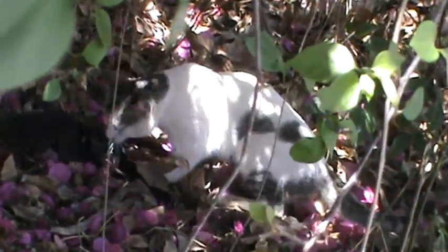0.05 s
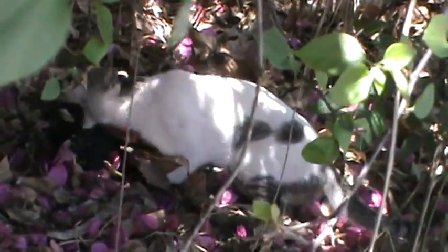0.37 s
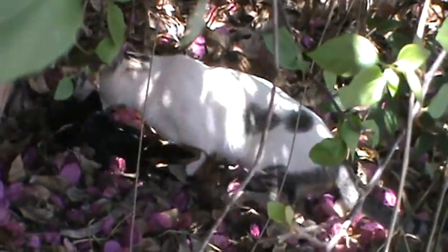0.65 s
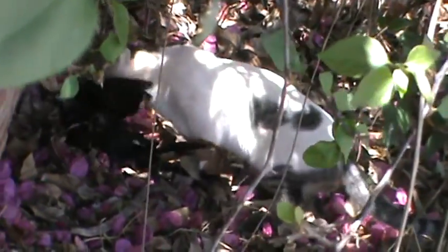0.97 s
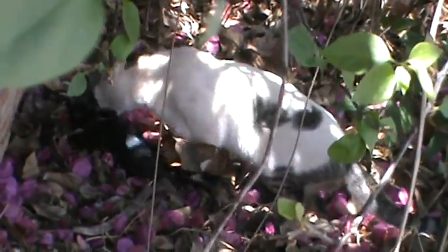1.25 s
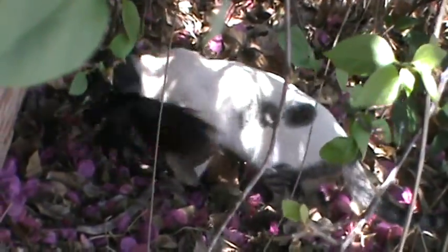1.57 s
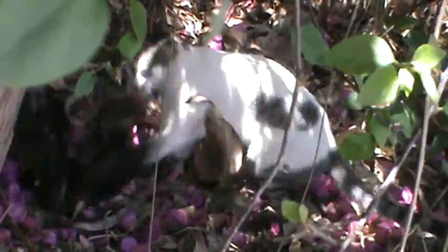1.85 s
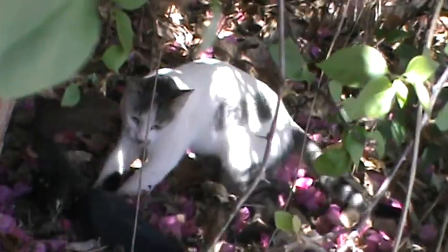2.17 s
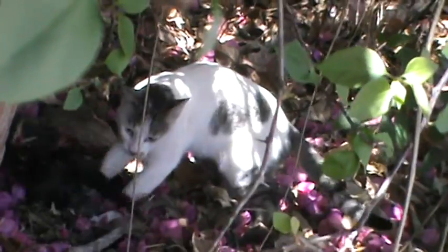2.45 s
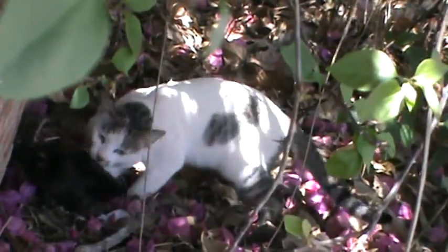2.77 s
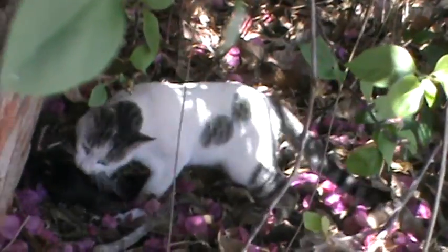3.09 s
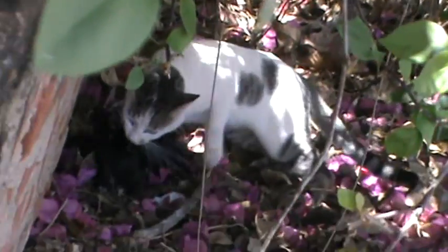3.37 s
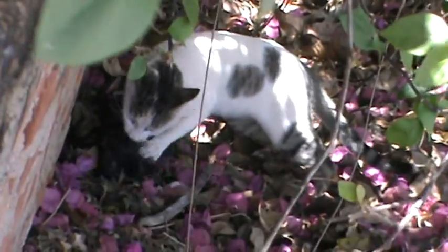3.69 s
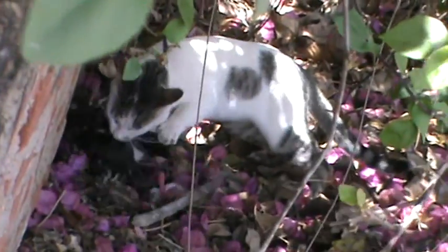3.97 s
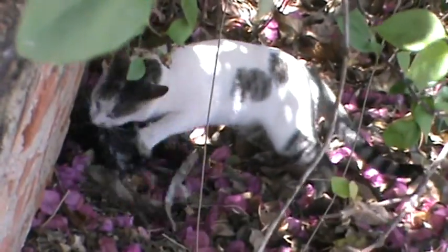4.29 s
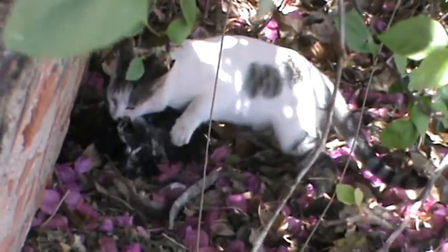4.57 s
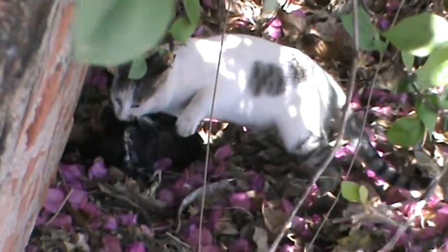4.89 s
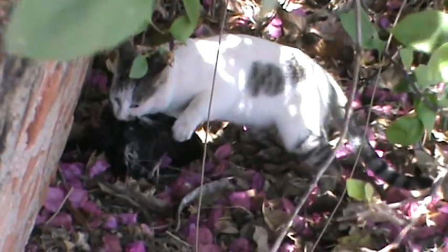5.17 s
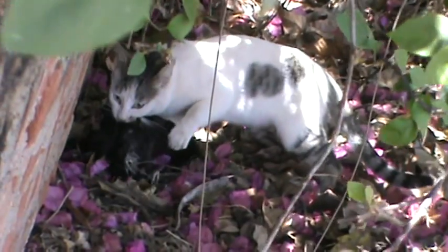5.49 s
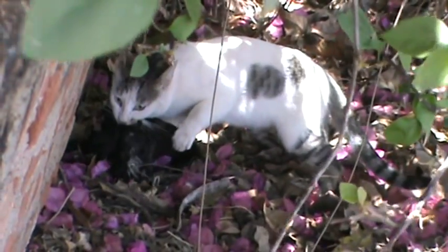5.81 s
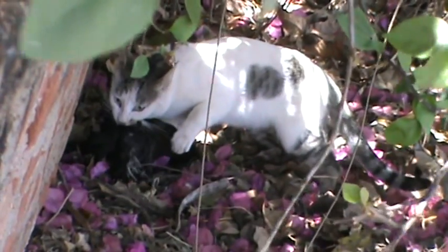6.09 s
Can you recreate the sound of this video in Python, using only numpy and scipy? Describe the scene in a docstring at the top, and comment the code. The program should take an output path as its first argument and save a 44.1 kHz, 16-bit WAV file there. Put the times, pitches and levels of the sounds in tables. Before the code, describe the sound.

Repeated raspy, nasal bird screams over a scuffle in dry leaves, with high alarm chirps and a few low microphone bumps.

```python
"""A bird screams again and again, pinned by a cat in dry leaves under a garden shrub.
Its voice breaks between a clear nasal tone (harmonics through throat and beak) and a rasp
(membranes slapping irregularly). Other birds whistle alarms, later pip, among garden echoes.
Leaves crackle in the scuffle, with one dull thud, over faint air noise. A hand-held camera
close by whines faintly, knocks and rumbles in the hand."""
import sys
import numpy as np
from scipy import signal
from scipy.fft import rfft, irfft, next_fast_len
from scipy.io import wavfile

SR = 44100
rng = np.random.default_rng(int(sys.argv[2]) if len(sys.argv) > 2 else 0)


def wav_out(sig):
    """Save sig, one row per channel (or a flat mono array), as 16-bit PCM at SR to the path in sys.argv[1]."""
    wavfile.write(sys.argv[1], SR, np.round(np.clip(np.atleast_2d(sig).T, -1, 1) * 32767).astype(np.int16))


N = 270774
TIME = np.arange(N) / SR

# outdoor air noise (frequency [Hz], level [dB])
AIR_SPECTRUM = [(12, -28), (20, 1), (54, 2), (200, -5.5), (497, -5.5), (2280, -11.5), (8620, -23.5),
                (15000, -25.5)]
# cat shifting in the leaves (time [s], level [dB], settling time [s])
PAW_STEPS = [(.03, -48, 0.072), (.14, -44.5, 0.067), (.9, -43, 0.16), (1.878, -35, 0.12), (1.945, -37, .14),
             (3.81, -47, 0.11), (4.15, -43, 0.18), (4.45, -49.5, 0.088), (4.745, -50, 0.073)]
# dry leaf crackle (frequency [Hz], level [dB])
LEAF_SPECTRUM = [(200, -9), (1500, -1), (8000, 0), (12500, 3), (15500, -2.5)]
# single leaves and twigs cracking (time [s], level [dB])
TWIG_CRACKS = [(1.857, -30), (2.959, -45.5), (3.811, -50), (4.735, -44), (4.854, -58), (5.545, -58)]
# low rumble (frequency [Hz], level [dB])
RUMBLE_SPECTRUM = [(12, -41), (20, -16), (55, -6.5), (108, -6), (260, -17), (604, -32.5), (900, -38),
                   (1170, -59), (1980, -120)]
# low rumbles: the hand shifting on the camera, and a dull thud from the scuffle at 1.95 s
# (time [s], level [dB], settling time [s])
LOW_RUMBLES = [(.08, -48, 0.6), (1.95, -50, 0.075), (4.87, -32.5, 0.32), (5.04, -33, 0.047),
               (5.5, -45.5, 0.16), (5.88, -37, 0.15), (6.09, -39, 0.16)]
# hand bumps (time [s], level [dB])
HAND_BUMPS = [(.085, -35), (1.305, -40.5), (4.938, -19), (5.002, -17), (5.07, -15.5), (5.606, -32),
              (5.656, -30.5), (5.855, -22.5), (6.076, -24.5)]
# alarm whistles (start [s], length [s], pitch [Hz], glide [Hz], level [dB])
ALARM_WHISTLES = [(.076, 0.084, 6130, 190, -37.5), (.137, 0.034, 3110, -2, -36),
                  (.142, 0.03, 4357, -420, -34), (.191, 0.036, 2734, -310, -37),
                  (.287, 0.1, 2513, -150, -42.5), (.288, 0.041, 3047, -80, -36.5),
                  (.316, 0.044, 6020, -310, -35.5), (.341, 0.0313, 4425, -700, -37),
                  (.428, 0.028, 2553, 0, -42.5), (0.454, 0.053, 3254, 1200, -36.5),
                  (.444, 0.064, 6310, 184, -37.5), (0.449, 0.061, 4710, -250, -33.5),
                  (.5, 0.0844, 4228, 356, -31.5), (.576, 0.054, 5860, -300, -35),
                  (.643, 0.038, 5970, 5, -27), (.761, 0.049, 6080, 5, -35.5), (.816, 0.065, 6195, 177, -31),
                  (.823, 0.031, 4284, -400, -27.5), (.844, 0.079, 4776, -400, -34),
                  (.892, 0.082, 6010, -500, -38.5), (.924, 0.076, 4596, -340, -29.5),
                  (.975, 0.054, 3910, -690, -36.5), (1.05, .152, 2505, 253, -34.5),
                  (1.117, 0.029, 3180, -410, -41), (1.232, 0.082, 3790, 1303, -37),
                  (1.24, 0.055, 5795, -200, -31.5), (1.28, 0.065, 4306, -330, -29.5),
                  (1.369, 0.024, 3410, -200, -41.5), (1.39, 0.06, 5550, -460, -37.5)]
# falling pips of a farther bird (start [s], level [dB])
FAR_PIPS = [(4.786, -45.5), (4.845, -48), (4.928, -43.5), (4.972, -44), (5.009, -51), (5.078, -47.5),
            (5.128, -49), (5.189, -54)]
# knocks on the camera body (time [s], peak [dB], tilt [dB/octave], rattle [dB])
BODY_KNOCKS = [(0.3097, -22, -1, -24), (3.415, -19.5, -0.5, -23), (5.085, -33.5, -2, -18),
               (5.323, -35.5, -6, -10)]
# camera casing modes (frequency [Hz], level [dB])
CASING_MODES = [(620, -2.5), (861, 1), (1168, 0.5), (1378, -0.5), (1647, -8), (2331, -2), (3200, -10.5)]
# screams, the last two feeble (start [s], clear from [s], crest [s], clear until [s], end [s],
# crest pitch [Hz], glide [Hz/s], tone [dB], overtone bite [dB], beamed treble [dB], rasp [dB])
BIRD_SCREAMS = [(.555, .68, .723, .826, 0.83, 1304, 4245, -23, 6, 2, -26),
                (1.499, 1.586, 1.641, 1.723, 1.748, 1232, 3690, -25.5, -1, 12.5, -25.5),
                (1.977, 1.977, 2.06, 2.093, 2.16, 1055, 2385, -32.5, -10.5, 18.5, -31.5),
                (2.364, 2.364, 2.438, 2.503, 2.535, 1169, 2410, -28.5, 1, 1.5, -26.5),
                (2.733, 2.733, 2.828, 2.91, 2.93, 1194, 3084, -28, 3.5, -1, -36),
                (3.118, 3.2, 3.212, 3.35, 3.37, 1199, 2480, -28, 3, -1, -29.5),
                (3.519, 3.578, 3.623, 3.716, 3.745, 1205, 2873, -27, 1.5, 4, -28),
                (3.903, 4.02, 3.995, 4.097, 4.1, 1233, 3300, -27.5, -1.5, 0.5, -27.5),
                (4.312, 4.352, 4.37, 4.402, 4.39, 962, 1400, -41.5, 3.5, -8, -35.5),
                (4.728, 4.728, 4.74, 4.81, 5.3, 830, 804, -54.5, -6, -3, -65)]
# resonances of the rasp (frequency [Hz], gain [dB])
RASP_RESPONSE = [(600, -16.5), (1270, -3.5), (1650, -3.5), (2200, 1.5), (2900, 3), (3600, -1.5),
                 (5000, -19), (6300, -11), (7800, -24.5), (9500, -17.5), (15000, -30)]
# throat and open beak (frequency [Hz], gain [dB])
THROAT_RESPONSE = [(500, -27), (1100, -5.5), (2100, 3), (3500, 5.5), (4170, -7), (4700, -5), (5550, -12.5),
                   (6500, -10.5), (7800, -24), (9500, -19), (15000, -24.5)]
# the part of the voice that shakes (frequency [Hz], gain [dB])
GROWL_RESPONSE = [(1400, -22), (2300, -2), (3100, 0.5), (4300, -5.5)]


def gain(db):
    """Decibels to amplitude."""
    return 10 ** (np.asarray(db) / 20)


def unit_rms(x):
    """Scales to rms 1."""
    return x / np.sqrt(np.mean(x ** 2) + 1e-20)


def db_at(spectrum, hz):
    """Interpolates a spectrum over log frequency."""
    points_hz, db = np.transpose(spectrum)
    return np.interp(np.log(hz + 1), np.log(points_hz + 1), db)


def add(mix, start_s, sound):
    """Mixes a sound in at start_s."""
    part = mix[max(round(start_s * SR), 0):][:len(sound)]
    part += sound[:len(part)]


def coloured(x, spectrum):
    """Zero-phase filter; output rms 1."""
    size = next_fast_len(len(x))
    response = gain(db_at(spectrum, np.fft.rfftfreq(size, 1 / SR)))
    return unit_rms(irfft(rfft(x, size) * response, size)[:len(x)])


def ringing(x, spectrum, size=2048):
    """Minimum-phase filter: each pulse rings on in the resonances; output rms 1."""
    log_gain = np.log(gain(db_at(spectrum, abs(np.fft.fftfreq(size, 1 / SR)))))
    impulse = np.fft.ifft(np.exp(np.conj(signal.hilbert(log_gain)))).real
    return unit_rms(signal.fftconvolve(x, impulse[:size // 2])[:len(x)])


def wander(t, hz):
    """Smooth noise, rms about 1, bandwidth about hz."""
    size = next_fast_len(max(len(t), SR // 2))
    lowpass = np.exp(-(np.fft.rfftfreq(size, 1 / SR) / hz) ** 2)
    return unit_rms(irfft(rfft(rng.standard_normal(size)) * lowpass, size))[:len(t)]


def swells(moves, rise_s):
    """Envelope of movements that build and settle, summed in power."""
    envelopes = (gain(db) * np.exp(-np.maximum((peak_s - TIME) / rise_s, (TIME - peak_s) / fall_s))
                 for peak_s, db, fall_s in moves)
    return np.sqrt(sum(envelope ** 2 for envelope in envelopes))


def air(db=-51.5):
    """Steady outdoor noise."""
    return gain(db) * coloured(rng.standard_normal(N), AIR_SPECTRUM)


def camera_whine(hz=15625, db=-64.5):
    """Thin tone of the electronics."""
    return gain(db) * unit_rms(np.sin(2 * np.pi * hz * TIME))


def scuffle(thrash_db=-20.5, settle_s=0.12, stir_db=-57, still_db=-63.5, still_from_s=4.9):
    """Force on the leaves: thrashing at each scream, paws, a stir that drops as the cat holds still."""
    thrashes = [(crest_s, db + thrash_db, settle_s)
                for _, _, crest_s, _, _, _, _, db, *_ in BIRD_SCREAMS]
    thrash = swells(thrashes, rise_s=0.15)
    paws = swells(PAW_STEPS, rise_s=0.06)
    stir = gain(np.where(TIME < still_from_s, stir_db, still_db))
    return np.sqrt(thrash ** 2 + paws ** 2 + stir ** 2)


def leaves(grains_per_s=2200, spread_db=2, clump_db=2, crush_db=-4, crack_s=0.01):
    """Clumps of tiny fractures over a soft crush, with a few louder cracks."""
    grains = (rng.random(N) < grains_per_s / SR) * rng.choice([-1, 1], N)
    grains = grains * gain(spread_db * np.minimum(rng.exponential(1, N), 4))
    crush = gain(crush_db) * rng.standard_normal(N)
    force = scuffle() * gain(clump_db * wander(TIME, 20.5))
    for start_s, db in TWIG_CRACKS:
        add(force, start_s, gain(db) * np.exp(-TIME[:SR // 10] / crack_s))
    return coloured(unit_rms(grains) + crush, LEAF_SPECTRUM) * force


def rumbles(lump_db=4, bump_s=0.0029, bump_hz=110):
    """Lumpy rubbing of the hand, one scuffle thud, and hand bumps that die within a cycle or two."""
    lumps = rng.standard_normal(N) * gain(lump_db * wander(TIME, 57))
    out = coloured(lumps, RUMBLE_SPECTRUM) * swells(LOW_RUMBLES, rise_s=0.077)
    t = TIME[:SR // 10]
    envelope = t / bump_s * np.exp(1 - t / bump_s)
    for start_s, db in HAND_BUMPS:
        hz = bump_hz * rng.uniform(0.8, 1.25)
        add(out, start_s, gain(db) * envelope * np.sin(2 * np.pi * hz * t))
    return out


def whistle(length_s, hz, glide_hz, db, straight_hz=2410, swift_per_s=7.7, flutter_db=3,
            harmonics_db=(0, -19, -29), side_hz=1400, fade_s=0.0084):
    """Shrill note gliding along a bow; swift glides carry the roughest burr."""
    t = np.arange(0, length_s, 1 / SR)
    position = t / length_s - 0.5
    # long notes arch upwards, short ones scoop
    bow_hz = 0.14 * (hz - straight_hz) * np.tanh((length_s - 0.0512) / 0.014)
    pitch_hz = hz + glide_hz * position - 2 * bow_hz * (position ** 2 - np.mean(position ** 2))
    sweep_per_s = np.ptp(pitch_hz) / hz / length_s
    burr = 0.033 * np.sqrt(sweep_per_s / swift_per_s + 0.012)
    phase = 2 * np.pi * np.cumsum(pitch_hz * (1 + burr * wander(t, 760))) / SR
    tone = sum(gain(level_db) * np.sin(k * phase) for k, level_db in enumerate(harmonics_db, 1))
    side_depth = gain(-19) * (hz / straight_hz - 1) * wander(t, 260)
    tone *= 1 + side_depth * np.sin(2 * np.pi * side_hz * t)  # faint sidebands
    fade = signal.windows.tukey(len(t), 2 * fade_s / length_s)
    return unit_rms(tone) * gain(db + flutter_db * wander(t, 177)) * fade


def other_birds(pip_s=0.019, pip_hz=2900, first_lift_hz=370, pip_glide_hz=-210):
    """A volley of whistles; later, pips that open high and settle."""
    out = np.zeros(N)
    for start_s, *note in ALARM_WHISTLES:
        add(out, start_s, whistle(*note))
    for k, (start_s, db) in enumerate(FAR_PIPS):
        hz = pip_hz + first_lift_hz * np.exp(-2 * k)
        add(out, start_s, whistle(pip_s, hz, pip_glide_hz, db))
    return out


def camera_knocks(t60_at_1khz_s=0.029, contact_s=0.0019, rattle_s=0.017, low_cut_hz=450):
    """A short chattering contact rings the casing; high modes die first."""
    out, t = np.zeros(N), TIME[:SR // 10]
    highpass = signal.butter(4, low_cut_hz, "high", fs=SR)
    for start_s, peak_db, tilt_db, rattle_db in BODY_KNOCKS:
        ring = np.zeros(len(t))
        for hz, mode_db in CASING_MODES:
            khz = hz / 1000
            envelope = gain(mode_db + tilt_db * np.log2(khz) - 60 * khz * t / t60_at_1khz_s)
            ring += envelope * rng.choice([-1, 1]) * np.sin(2 * np.pi * hz * t)
        chatter = np.exp(-t / contact_s) + gain(rattle_db) * np.exp(-t / rattle_s)
        contact = rng.standard_normal(len(t)) * chatter
        contact[0] += 1
        knock = signal.lfilter(*highpass, signal.fftconvolve(ring, contact)[:len(t)])
        add(out, start_s, gain(peak_db) * knock / abs(knock).max())
    return out


def rasp(start_s, peak_s, end_s, db, slap_hz=350, low_hz=930, high_hz=1240, chaos=0.1048,
         tone_db=4, hiss_db=-12, onset_s=0.018, swell_db=14, surge_db=2):
    """Membranes slap irregularly; each slap starts unsteady cycles whose pitch rises with effort."""
    t = np.arange(start_s, end_s, 1 / SR)
    effort = np.interp(t, [start_s, peak_s, end_s], [0, 1, 0])
    breakup = np.minimum((t - start_s) / onset_s, 1) ** 2  # first cycles are clean
    slap_cycles = np.cumsum(slap_hz * np.exp(0.4 * wander(t, 500))) / SR
    slaps = np.diff(np.floor(slap_cycles), prepend=0) * breakup
    pitch_hz = (low_hz + (high_hz - low_hz) * effort) * (1 + chaos * np.sqrt(effort) * wander(t, 562))
    cycles = np.cumsum(pitch_hz) / SR
    tone = sum(np.cos(2 * np.pi * (k * cycles + rng.random())) for k in range(1, 13))
    tone *= np.exp(-2 * (slap_cycles % 1))  # decay after each slap
    hiss = gain(hiss_db) * breakup * rng.standard_normal(len(t))
    voice = ringing(unit_rms(slaps) + gain(tone_db) * unit_rms(tone) + hiss, RASP_RESPONSE)
    level_db = db + swell_db * (effort - 1) + surge_db * wander(t, 110)
    return voice * gain(level_db) * signal.windows.tukey(len(t), 0.07)


def clear_tone(start_s, crest_s, end_s, crest_hz, glide_hz_per_s, db, bite_db, treble_db, fade_s,
               round_s=0.035, droop_db_per_hz=0.04, slack_db_per_hz=0.05, flutter_db=0.94,
               rough_db=-24.5, break_db=-10, settle_s=0.02, hoarse_below_db=-44.5):
    """Harmonics on one pitch arch, through a throat that tunes up with the pitch as the beak opens."""
    t = np.arange(start_s, end_s, 1 / SR)
    drop_hz = glide_hz_per_s * (np.hypot(t - crest_s, round_s) - round_s)
    hz = crest_hz - drop_hz
    jitter = 0.00695 * wander(t, 300) + 0.00583 * wander(t, 37.7)
    cycles = np.cumsum(hz * (1 + jitter)) / SR
    opening = (hz / 1170) ** 0.35
    voice = np.zeros(len(t))
    for k in range(1, 16):
        beamed = np.clip(k * hz / 3500 - 1, 0, 1)  # the beak beams the high harmonics
        flicker_db = 2.5 * (0.5 + beamed) * wander(t, 84)
        harmonic_db = db_at(THROAT_RESPONSE, k * hz / opening) + beamed * treble_db + flicker_db
        if k > 2:  # a slack, low voice loses its overtones
            harmonic_db += bite_db - slack_db_per_hz * drop_hz
        voice += gain(harmonic_db) * np.cos(2 * np.pi * (k * cycles + rng.random()))
    to_edge_s = np.minimum(t - t[0], t[-1] - t)
    hoarseness = min(gain(hoarse_below_db - db) ** 2, 1)
    roughness = gain(rough_db) + gain(break_db) * np.exp(-to_edge_s / settle_s) + hoarseness
    growl = coloured(voice * wander(t, 730), GROWL_RESPONSE)  # uneven cycles
    level_db = db - droop_db_per_hz * drop_hz + flutter_db * wander(t, 63)
    return (unit_rms(voice) + roughness * growl) * gain(level_db) * np.minimum(to_edge_s / fade_s, 1)


def caught_bird(edge_s=0.006, overlap_s=0.012, crumble_s=0.034, build_s=0.074):
    """Each scream is a clear tone; the voice may break into a rasp before and after it."""
    out = np.zeros(N)
    for start_s, clear_s, crest_s, until_s, end_s, *voice, rasp_db in BIRD_SCREAMS:
        tone = clear_tone(clear_s - edge_s, crest_s, until_s + edge_s, *voice, fade_s=2 * edge_s)
        add(out, clear_s - edge_s, tone)
        lead_in = (start_s, clear_s - overlap_s, clear_s + overlap_s)
        tail = (until_s - crumble_s, until_s - overlap_s, end_s)
        for length_s, span in [(clear_s - start_s, lead_in), (end_s - until_s, tail)]:
            if length_s > overlap_s:
                strength = min(length_s / build_s, 1)  # short rasps stay weak
                add(out, span[0], strength * rasp(*span, rasp_db))
    return out


def garden_echoes(x, t60_s, delay_s=0.002, echoes_per_s=2000):
    """Scattered echoes from ground, trunks and walls."""
    t = TIME[:SR]
    taps = rng.standard_normal(SR) * (rng.random(SR) < echoes_per_s / SR)
    taps *= (t > delay_s) * gain(-60 * t / t60_s)
    return signal.fftconvolve(x, taps / np.linalg.norm(taps))[:N]


def scene():
    """Mono mix: the caught bird close and nearly dry, the others farther off among echoes."""
    caught, others = caught_bird(), other_birds()
    near = caught + gain(-9.5) * garden_echoes(caught, t60_s=0.19)
    far = gain(0.5) * others + gain(-4) * garden_echoes(others, t60_s=0.093)
    far += gain(-1) * garden_echoes(others, t60_s=0.41)
    return (near + far + air() + camera_whine() + leaves() + camera_knocks() + rumbles())[None]


def record(dry, cutoff_hz=15780):
    """The recorder's band limit."""
    lowpass = signal.firwin(1023, cutoff_hz, window=("kaiser", 9), fs=SR)
    return signal.oaconvolve(dry, lowpass[None], "same")


dry = scene()
out = record(dry)
wav_out(out)
```